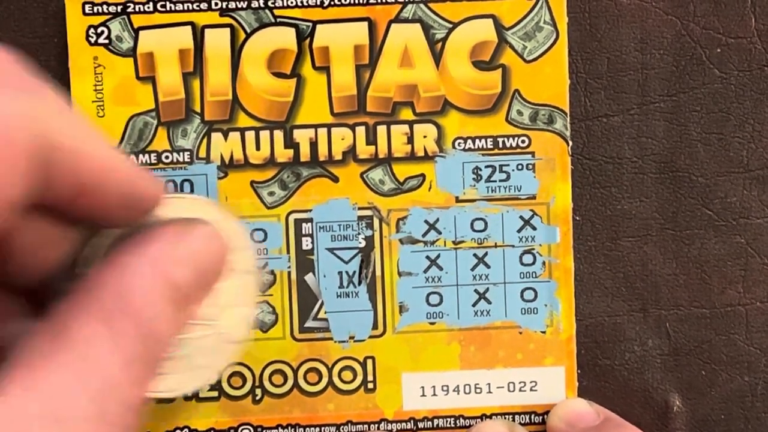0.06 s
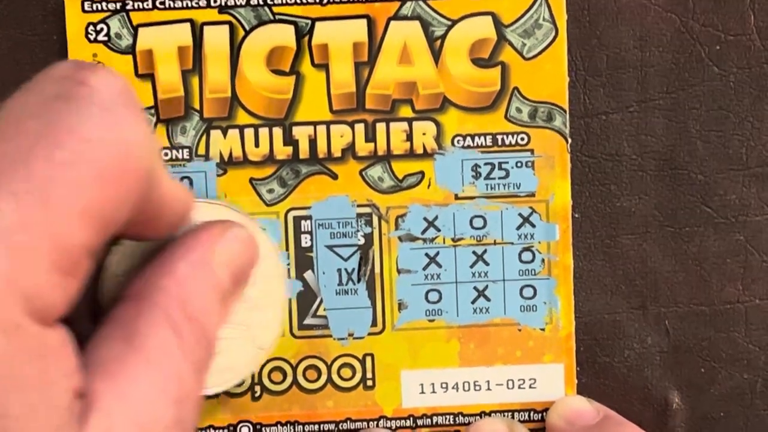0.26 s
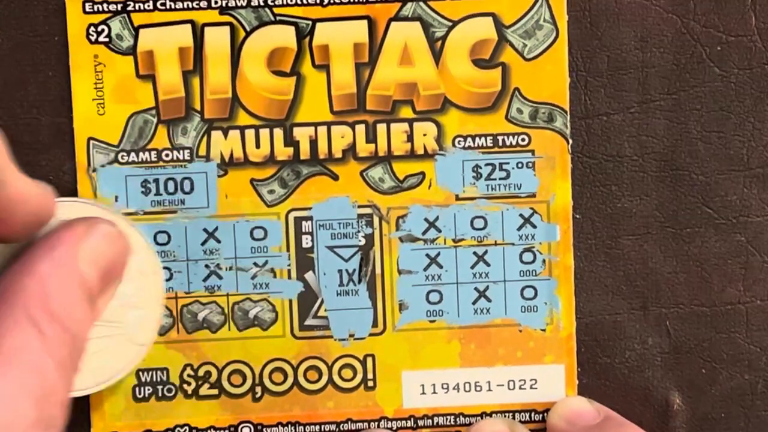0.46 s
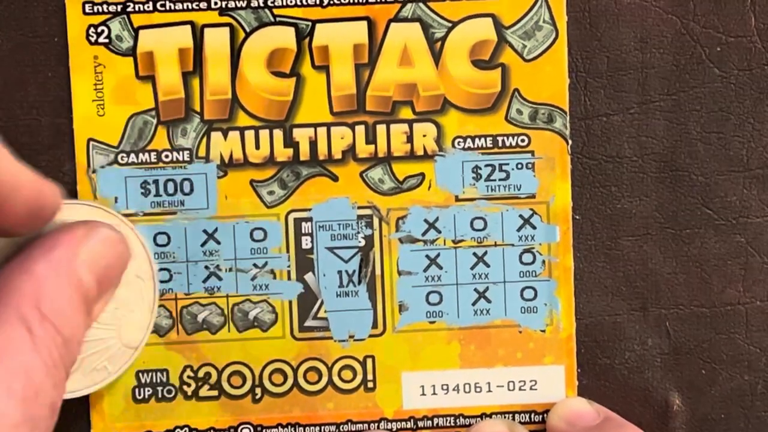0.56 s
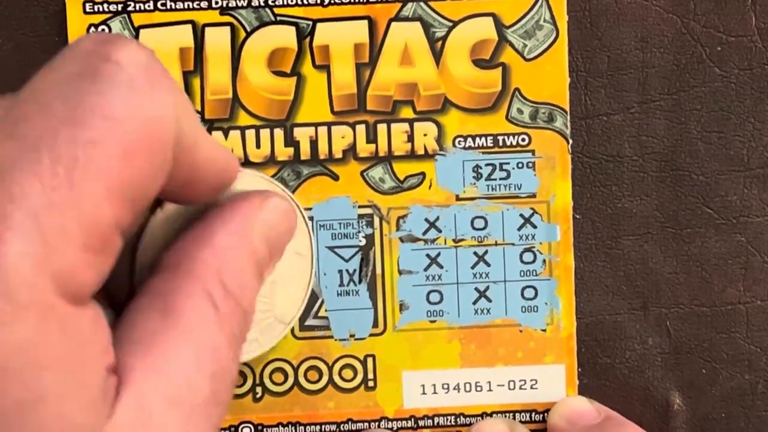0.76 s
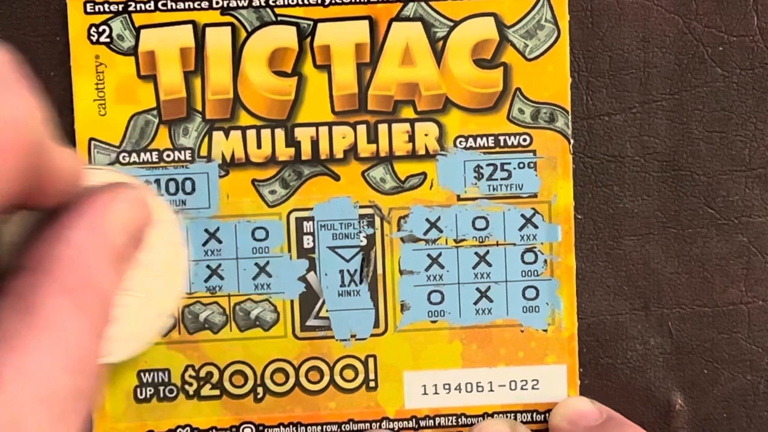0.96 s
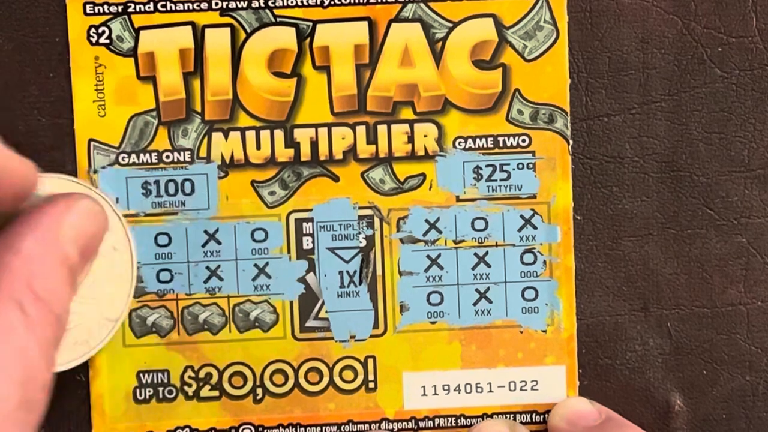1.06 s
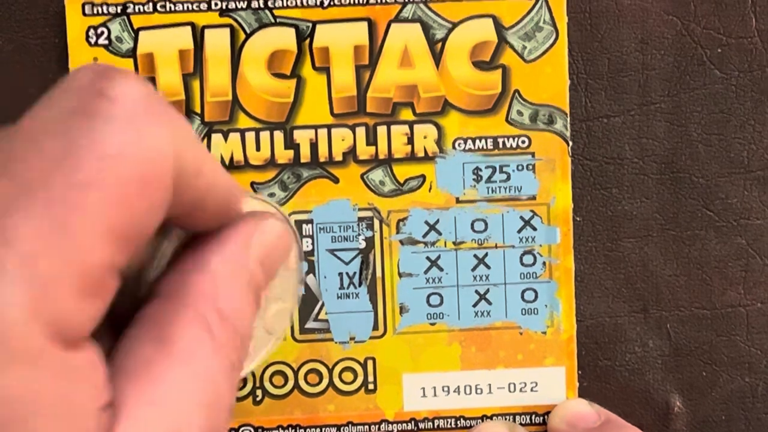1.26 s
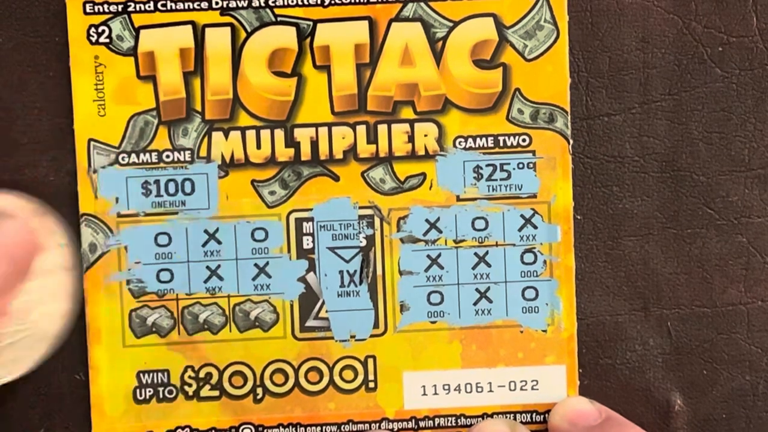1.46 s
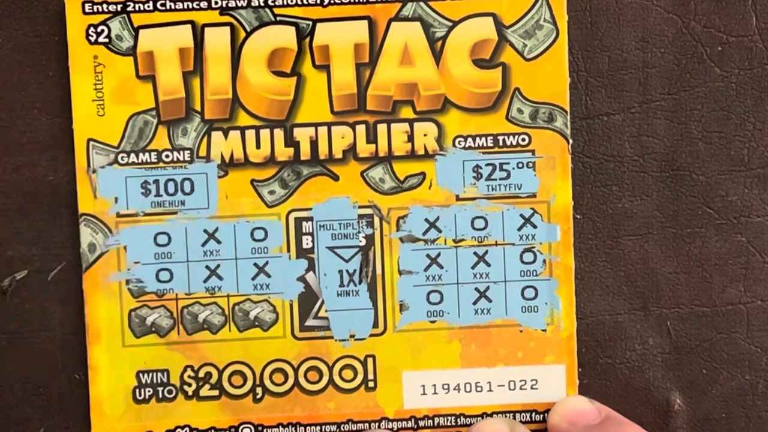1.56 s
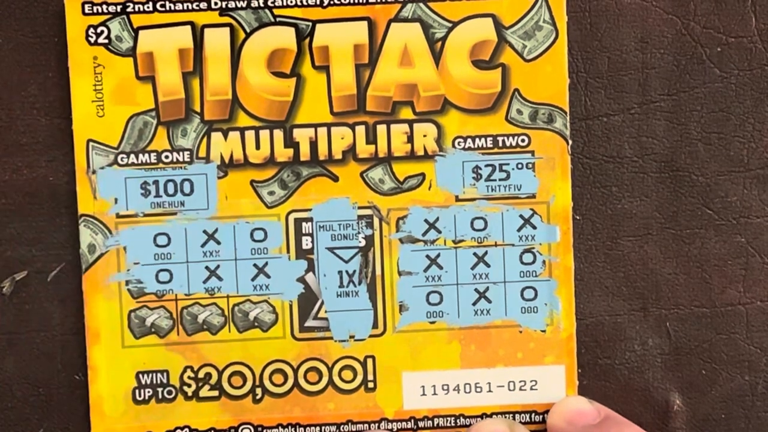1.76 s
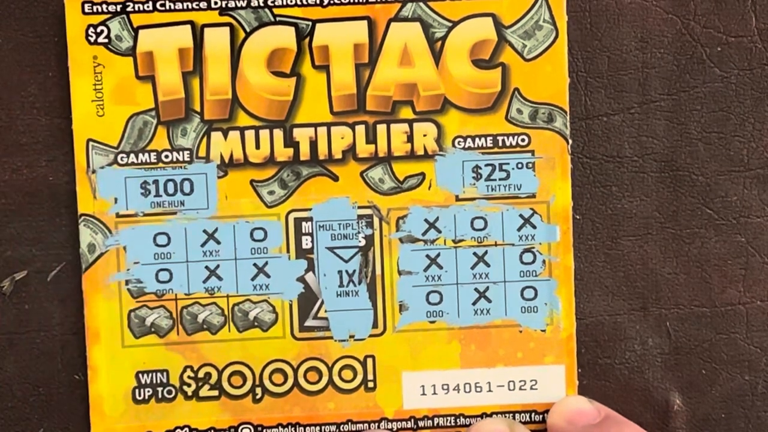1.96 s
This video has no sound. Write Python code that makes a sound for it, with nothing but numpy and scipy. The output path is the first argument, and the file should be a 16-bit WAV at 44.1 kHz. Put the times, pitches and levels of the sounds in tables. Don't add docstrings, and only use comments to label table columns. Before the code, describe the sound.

Coin scraping a paper ticket on a hollow table: three hard taps with brief scratches, final knock

```python
import sys
import numpy as np
from scipy import signal
from scipy.fft import rfft, irfft, next_fast_len
from scipy.io import wavfile

SR = 44100
rng = np.random.default_rng(int(sys.argv[2]) if len(sys.argv) > 2 else 0)


def transcribe(u):
    v = np.clip(np.atleast_2d(u).T, -1, 1)
    q = np.round(v * 32767).astype(np.int16)
    wavfile.write(sys.argv[1], SR, q)


def gain_from_db(level_db):
    decades = np.asarray(level_db, float) / 20
    return 10 ** decades


N = 88420

# [t/s, level/dB, edge crack level/dB, contact cut f/Hz]
LANDINGS = [
    (0.1416, 0, -1, 7000),
    (0.7514, -1.5, -3, 4360),
    (1.2778, 0.5, 1, 13900),
]
# [f/Hz, level/dB, direction (sign), t60/s, left/right (ratio)]
TABLE_MODES = [(136.3, -22.5, -1, 0.13, 0.94), (227.4, -47.5, 1, 0.7, 1.6), (287.3, -8.5, 1, 0.059, 0.71),
               (310, -23.5, 1, 0.16, 1), (453, -5.5, -1, 0.029, 0.62), (627, -20, -1, 0.063, 0.88),
               (739, -20, -1, 0.051, 2.9), (834, -17.5, -1, 0.054, 0.04), (889, -19, -1, 0.052, 2.9),
               (1033, -15, -1, 0.034, 0.69), (1363, -17.5, -1, 0.02, 0.78), (1512, -18.5, -1, 0.019, 1.14),
               (1870, -20, 1, 0.015, 0.82), (2380, -16, 1, 0.016, 1)]
# one row a landing, [level/dB of each table mode]
SPOTS = [(.1, .1, 0.068, .1, -0.49, .1, .1, 0.61, 0.95, .1, .1, .1, .1, 0.5),
         (.1, .1, 0.13, .1, -0.79, -0.25, .1, 0.022, 1.3, 0.9, .1, .1, -1.6, -4),
         (.1, .1, .1, .1, -1.5, -1.5, -1.5, -1.5, -1.5, .1, .1, .1, 1.5, 3)]
# [level/dB], one for each landing
FINGER_WEIGHT = (1, -6, 1)
FINGER_LEAD_S, FINGER_DB, FINGER_CUT_HZ = 0.009, -29.5, 8800
LANDING_SPREAD = .061


def landings():
    coins = [(s, db, cut_hz) for s, db, _, cut_hz in LANDINGS]
    fingers = []
    for (s, db, *_), weight_db in zip(LANDINGS, FINGER_WEIGHT):
        fingers.append((s - FINGER_LEAD_S, db + FINGER_DB + weight_db, FINGER_CUT_HZ))
    spots = np.array(SPOTS)
    return table(coins + fingers, TABLE_MODES, LANDING_SPREAD, np.vstack([spots, spots]))


# [t/s, level/dB, edge crack level/dB, contact cut f/Hz]
KNOCKS = [
    (1.4737, 0, -9.5, 5900),
    (1.5, -24, -34, 5700),
    (1.131, -21, -56, 400),
]
# [f/Hz, level/dB, direction (sign), t60/s, left/right (ratio)]
MODES_BESIDE = [(142.8, -36, 1, 0.0079, 1.7), (273, -16.5, 1, 0.063, 0.75), (340.5, -21, -1, 0.098, 0.87),
                (443.8, -12.5, -1, 0.052, 0.89), (435, -18.5, 1, 0.073, 0.96), (519, -26, -1, 0.11, 0.52),
                (716, -37.5, -1, 0.12, 2.3), (880, -19, -1, 0.068, 0.54), (972, -24, -1, 0.045, 1.6),
                (1240, -27, 1, 0.055, 0.73), (1430, -24, 1, 0.029, 1), (1850, -27, -1, 0.013, 1.02),
                (2300, -37, -1, 0.021, 1)]
KNOCK_SPREAD = .098


def knocks():
    return table([(s, db, cut_hz) for s, db, _, cut_hz in KNOCKS], MODES_BESIDE, KNOCK_SPREAD)


STRIKE_VARIES_DB = 0.38


def table(blows, modes, spread, spots_db=0):
    out = np.zeros((2, N))
    spots_db = spots_db + np.zeros((len(blows), len(modes)))

    def bend(hz, cut_hz):
        wave = np.exp(-4j * np.pi * spread * np.sqrt(hz))
        return wave / (1 + (hz / cut_hz) ** 2)

    for (s, db, cut_hz), spot_db in zip(blows, spots_db):
        click = np.zeros(N)
        click[int(s * SR)] = gain_from_db(db)
        click = shaped(click, lambda hz: bend(hz, cut_hz))
        chances = spot_db + STRIKE_VARIES_DB * rng.standard_normal(len(modes))
        for (hz, mode_db, way, t60, left), chance in zip(modes, chances):
            level = np.sign(way) * gain_from_db(mode_db + chance) * 2 / (1 + left)
            out += level * np.outer([left, 1], ring(click, hz, t60))
    return out


CRACK_LATE_S, KNOCK_CRACK_LATE_S = 0.001102, 0.001915


def sharp_hits():
    hits = [(s + CRACK_LATE_S, db) for s, _, db, _ in LANDINGS]
    return hits + [(s + KNOCK_CRACK_LATE_S, db) for s, _, db, _ in KNOCKS]


# [f/Hz, level/dB per Hz]
CRACK = [(2500, 11), (4000, -10), (7000, -3), (11000, -11), (16000, -4)]
# [level/dB], landings then knocks
CRACK_TOP = (4, 0, -14, -5, -3.0, -3.0)
TOP_FROM_HZ = 11000
CRACK_DB, CRACK_T60_S, SNAP_DB, SNAP_T60_S = -33.5, 0.023, -25.5, 0.0099


def crack():
    hits = sharp_hits()

    def dying(blows):
        slow = gain_from_db(CRACK_DB) * after(blows, CRACK_T60_S, 0.0011)
        return slow + gain_from_db(SNAP_DB) * after(blows, SNAP_T60_S, 0.00015)

    body = dying(hits)
    top = dying([(s, db + top_db) for (s, db), top_db in zip(hits, CRACK_TOP)])
    return bands([(1500, -19)] + CRACK, lambda hz: top if hz > TOP_FROM_HZ else body)


# [f/Hz, level/dB, t60/s]
EDGE = [(2874, -30.5, 0.035), (3140, -40.5, 0.012), (3667, -44, 0.07), (1594, -35, 0.16),
        (2124, -35, 0.078), (4050, -62, 0.057)]
# [level/dB], landings then knocks
EDGE_SQUARE = (-4.0, -5, 3, 1.5, -3.0, -3.0)


def edge_ring():
    blows = [(s, db + edge_db, SR) for (s, db), edge_db in zip(sharp_hits(), EDGE_SQUARE)]
    return table(blows, [(hz, db, 1, t60, 1) for hz, db, t60 in EDGE], 0)


# [f/Hz, level/dB per Hz]
RATTLE = [(80, -22.5), (250, 8.5), (700, -1), (1500, -6), (3000, -24.5), (6000, -25), (12000, -46)]
# [f/Hz, t60/s]
RATTLE_T60 = [(80, 0.24), (250, 0.28), (700, 0.21), (1500, 0.2), (4000, 0.067), (10000, 0.23)]
RATTLE_DB, RATTLE_RISE_S = -22.5, 0.0019


def rattle():
    heavy = [row[:2] for row in LANDINGS]
    heavy += [(s + 0.0011, db - 10.5) for s, db, *_ in KNOCKS]
    return gain_from_db(RATTLE_DB) * bands(RATTLE, lambda hz: after(heavy, at_hz(RATTLE_T60, hz), RATTLE_RISE_S))


# [t/s, speed as grit level/dB, bite into the paper level/dB, weight on the table level/dB]
DRAG = [(0, -61, -45.5, -36.5), (0.014, -61.5, -63.5, -59.5), (0.242, -65.5, -52.5, -45.5),
        (0.303, -52, -45.5, -50), (.42, -53.5, -50.5, -48), (0.498, -65, -47, -49),
        (0.533, -113, -66.5, -64.5), (.83, -66, -56, -51.5), (0.909, -50.5, -48.5, -45.5),
        (.99, -57, -54, -45.5), (1.04, -61, -52.5, -45), (1.08, -72, -61, -54), (1.26, -71.5, -68, -64.5),
        (1.34, -60.5, -48, -42.5), (1.43, -61, -43.5, -41.5), (1.5, -64.5, -50.5, -58),
        (1.63, -57.5, -64.5, -60), (1.77, -75, -65, -66.5)]
# [t/s, length/s, grit level/dB, bite level/dB]
FLICKS = [
    (1.012, 0.033, -64, -54),
    (1.436, 0.017, -48.5, -49),
]
# [f/Hz, level/dB per Hz]
PAPER = [(500, -2), (1200, 2.5), (2500, 0.5), (3500, -8), (5000, -5), (8000, -11.5), (11000, -12),
         (16000, -20)]
# [f/Hz, width/Hz, level/dB]
COIN = [(4144, 230, -15), (4540, 120, -15.5), (6220, 210, -24), (7000, 280, -21), (8620, 340, -16),
        (9100, 1500, -14.5)]
# [f/Hz, width/Hz, level/dB]
SHAKEN = [(59, 99, -25), (139.3, 29, 0), (235, 53, -9), (276.3, 50, -1.5), (399, 58, -9), (647, 15, -24),
          (895, 57, -5), (1113, 99, -8), (1485, 250, -7), (2013, 260, -16), (2255, 53, -18),
          (2744, 31, -20.5)]
FLICK_RISE_S, FLICK_FADE_S, FLICK_CUT_HZ = 0.0029, 0.014, 9400
PAPER_DB, RUMBLE_DB, GRIT_PATCHY_DB, RUMBLE_PATCHY_DB = 2, -2.5, 0.9, 1.5
MODE_PATCHY_DB, PAPER_FROM_HZ = 2.2, 550
COIN_PATCHY_DB, COIN_FULL_DB = 5.5, -43.5


def drag():
    times, *controls = np.transpose(DRAG)
    speed, bite, weight = (gain_from_db(in_time(times, db)) for db in controls)

    pressed = np.minimum(bite / gain_from_db(COIN_FULL_DB), 1)
    coin = speed * pressed * shaken(COIN, grit()[0], COIN_PATCHY_DB)
    paper = rms_one(shaped(grit(), lambda hz: gain_from_db(at_hz([(150, -46)] + PAPER, hz))))
    hiss = speed * paper
    hiss[0] += gain_from_db(7.0) * coin

    bright = shaped(np.diff(paper, prepend=0), lambda hz: 1 / (1 + (hz / FLICK_CUT_HZ) ** 8))
    bright = rms_one(bright)
    for s, length, grit_db, bite_db in FLICKS:
        shape = in_time(s + np.array([0, FLICK_RISE_S, length, length + FLICK_FADE_S]), [0, 1, 1, 0])
        hiss = hiss + gain_from_db(grit_db) * shape * bright
        bite = bite + gain_from_db(bite_db) * shape

    low_modes = [mode for mode in SHAKEN if mode[0] < PAPER_FROM_HZ]
    upper_modes = [mode for mode in SHAKEN if mode[0] >= PAPER_FROM_HZ]
    low = weight * shaken(low_modes, grit(), MODE_PATCHY_DB)
    upper = gain_from_db(1.5) * bite * shaken(upper_modes, grit(), MODE_PATCHY_DB)
    rumble = gain_from_db(RUMBLE_DB + RUMBLE_PATCHY_DB * drift(33.0)) * (low + upper)
    return ports(*gain_from_db(PAPER_DB + GRIT_PATCHY_DB * drift(36)) * hiss + rumble)


GRIT_PER_S, GRIT_SIZES_DB = 4200, 4


def grit():
    sizes = gain_from_db(GRIT_SIZES_DB * np.minimum(rng.exponential(1, (2, N)), 4))
    clicks = sizes * rng.choice([-1, 1], (2, N))
    return rms_one(clicks * (rng.random((2, N)) < GRIT_PER_S / SR))


def shaken(resonances, force, patchy_db):
    out = 0
    for hz, width, db in resonances:
        out = out + gain_from_db(db + patchy_db * drift(8.9)) * rms_one(ring(force, hz, 2.8 / width))
    return out


# [t/s, length/s, f/Hz, width/Hz,
# level/dB]
SINGS = [(.28, 0.24, 1555, 140, -50.5), (0.41, 0.067, 1250, 110, -52.5), (0.28, 0.22, 2190, 120, -57),
         (0.28, .19, 2600, 110, -59.5), (0.31, 0.05, 136, 25, -51), (0.46, 0.092, 134, 18, -50),
         (.30, 0.21, 4300, 100, -67), (.96, 0.048, 269, 35, -44.5), (.92, 0.036, 317, 62, -47),
         (0.88, 0.095, 3900, 80, -61), (0.903, 0.06, 4530, 79, -65), (0.96, 0.072, 226, 35, -50),
         (1.01, .04, 1240, 70, -53), (1.04, 0.023, 2100, 98, -60), (1.016, 0.027, 4530, 200, -67),
         (1.364, 0.029, 312, 30, -42.5), (1.397, 0.033, 910, 230, -46), (1.436, 0.023, 3100, 290, -54),
         (1.439, 0.015, 4200, 400, -50), (1.44, 0.028, 6000, 280, -50.5), (1.526, .16, 1400, 69, -60),
         (1.57, 0.05, 1800, 95, -71), (1.57, .08, 6400, 130, -68), (1.587, 0.12, 7700, 140, -69),
         (1.66, 0.074, 5850, 120, -73), (1.656, 0.067, 880, 69, -62), (1.595, 0.15, 8900, 620, -71.5),
         (.02, 0.073, 1160, 120, -61.5), (0.463, 0.056, 1100, 810, -54), (1.375, .03, 1100, 670, -53),
         (1.3, 0.037, 1200, 760, -49), (1.3045, .005, 5100, 5400, -51), (.775, 0.016, 770, 80, -43)]
SING_EDGE_SHARE = 0.19


def singing():
    force, out = grit(), 0
    for s, length, hz, width, db in SINGS:
        corners = np.array([0, SING_EDGE_SHARE, 1 - SING_EDGE_SHARE, 1])
        shape = in_time(s + length * corners, [0, 1, 1, 0])
        out = out + gain_from_db(db) * shape * rms_one(ring(force, hz, 5.7 / width))
    return ports(*out)


# [t/s, level/dB, f/Hz]
TICKS = [(.001, -48, 5500), (.026, -54, 7700), (.038, -51.5, 5420), (.064, -52, 8000), (0.075, -51, 5460),
         (0.082, -53, 8130), (.2, -56, 8160), (0.221, -53, 7800), (1.085, -57, 5100)]
TICK_T60_S = 0.048


def ticks():
    out = np.zeros(N)
    for s, db, hz in TICKS:
        burst = after([(s, db)], TICK_T60_S, 0.0011) * rng.standard_normal(N)
        out += ring(burst, hz, 0.0099) * 0.2
    return out


# [f/Hz, level/dB per Hz]
AIR = [(30, 0.5), (55, -2.5), (140, -5.5), (230, -4), (500, -13), (1500, -15.5), (4500, -28.5), (7000, -28),
       (11000, -41.5)]
AIR_DB, AIR_TOP_DB = -56.5, -38


def room_air():
    return bands(AIR + [(16500, AIR_TOP_DB)], lambda hz: gain_from_db(AIR_DB + 1.3 * drift(3.9)))


# [f/Hz, level/dB]
UNLIKE = [(100, -36), (300, -17), (700, -1.5), (1400, -11), (2200, -56), (7200, -43), (9000, -1),
          (16000, -19)]
# [f/Hz, level/dB]
LEAN = [(100, 0.1), (200, -1.5), (400, -2.5), (800, -2.5), (1400, -1.5), (2200, 0)]


def ports(mid, side):
    side = shaped(side, lambda hz: gain_from_db(at_hz(UNLIKE, hz)))
    both = np.array([mid + side, mid - side])
    return shaped(both, lambda hz: gain_from_db(np.outer([.5, -.5], at_hz(LEAN, hz))))


def bands(spectrum, gain):
    white = rng.standard_normal((2, 2, N))
    edges, out = 22 * 2 ** np.arange(0, 10, .5), 0
    norm = np.sqrt(np.sum(gain_from_db(at_hz(spectrum, edges)) ** 2 * edges * .8 / SR))
    for k, low in enumerate(edges):
        high = min(low * np.sqrt(2), .47 * SR)
        sos = signal.butter(2, [low, high], "band", fs=SR, output="sos")
        hz = low * 2 ** .25
        out = out + gain_from_db(at_hz(spectrum, hz)) * gain(hz) * signal.sosfilt(sos, white[k % 2])
    return ports(*out / norm)


def after(blows, t60, rise_s):
    starts, levels_db = np.array(blows)[:, :1], np.array(blows)[:, 1:2]
    t = np.maximum(np.arange(N) / SR - starts, 0)
    return np.sum(gain_from_db(levels_db - 60 * t / t60) * (1 - np.exp(-t / rise_s)), axis=0)


def ring(x, hz, t60):
    r, w = gain_from_db(-60 / (t60 * SR)), 2 * np.pi * hz / SR
    return signal.lfilter([0, np.sin(w)], [1, -2 * r * np.cos(w), r * r], x + 1e-18)


def drift(rate):
    r = np.exp(-80 * np.pi * rate / SR)
    slow = signal.lfilter([1], [1, -2 * r, r * r], rng.standard_normal(N // 40 + 502))[500:]
    return np.interp(np.arange(N) / 40, np.arange(len(slow)), rms_one(slow))


def shaped(x, response):
    size = next_fast_len(N + 8192)
    hz = np.arange(size // 2 + 1) * SR / size
    return irfft(rfft(x, size) * response(hz), size)[..., :N]


def rms_one(x):
    return x / np.sqrt(np.mean(x ** 2) + 1e-20)


def in_time(s, values):
    return np.interp(np.arange(N) / SR, s, values)


def at_hz(points, hz):
    f, v = np.transpose(points)
    return np.interp(np.log(np.maximum(hz, 1)), np.log(f), v)


def scene():
    blows = landings() + knocks() + crack() + edge_ring() + rattle()
    return blows + drag() + singing() + ticks() + room_air()


def top_cut(x):
    return signal.sosfilt(signal.butter(12, 16780, fs=SR, output="sos"), x)


# [f/Hz, phase/rad]
LEAD = [(0, 0), (690, -0.0), (950, 0.4), (1290, 0.1), (3960, -0.0), (4570, -0.4), (4820, -1.3),
        (5340, -5.7), (5770, -6.3), (7490, -6.3), (7750, -6.7), (10900, -8.3), (12100, -9.3), (16400, -9.5)]
OVERLOAD = 1.75
LOW_CUT_HZ, TOP_CUT_HZ = 43, 16300


def record(dry):
    lead_hz, lead = np.transpose(LEAD)

    def turn(hz):
        return np.exp(1j * np.outer([.5, -.5], np.interp(hz, lead_hz, lead) * (hz > 1300)))

    mix = OVERLOAD * np.tanh(shaped(dry, turn) / OVERLOAD)
    mix = signal.sosfilt(signal.butter(2, LOW_CUT_HZ, "high", fs=SR, output="sos"), mix)
    mix = signal.sosfilt(signal.butter(8, TOP_CUT_HZ, fs=SR, output="sos"), mix)
    return top_cut(mix)


dry = scene()
out = record(dry)
transcribe(out)
```